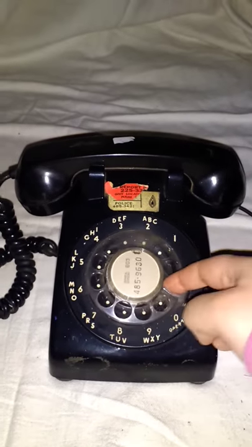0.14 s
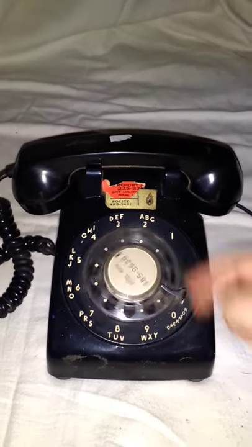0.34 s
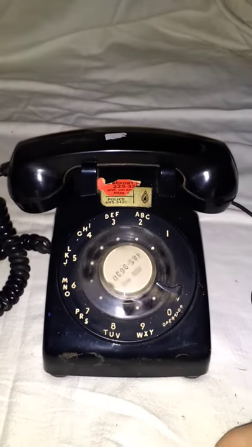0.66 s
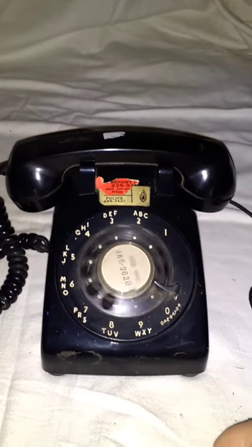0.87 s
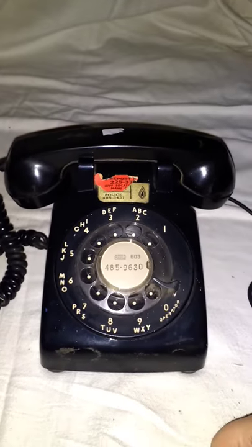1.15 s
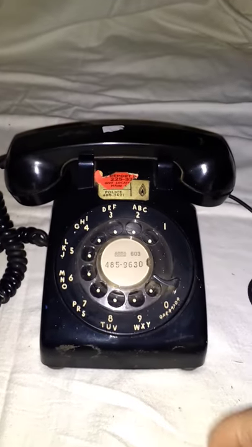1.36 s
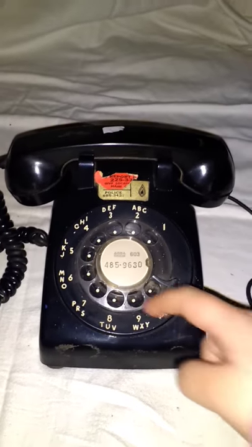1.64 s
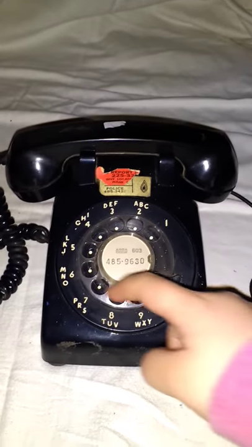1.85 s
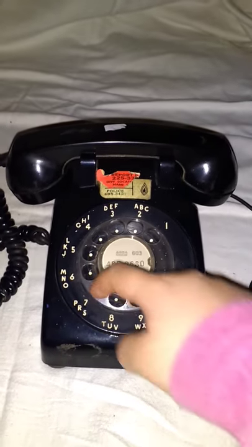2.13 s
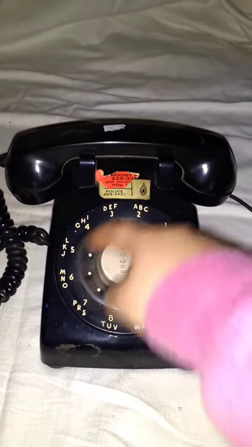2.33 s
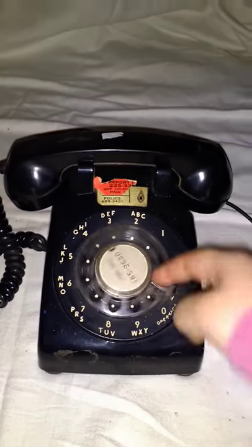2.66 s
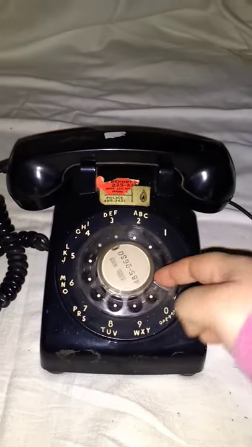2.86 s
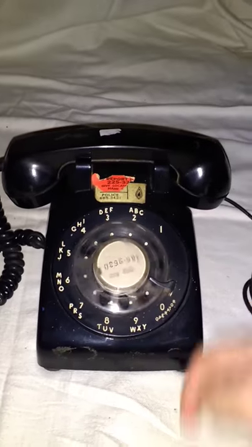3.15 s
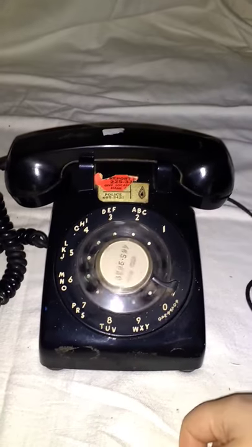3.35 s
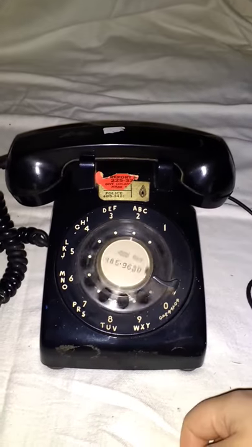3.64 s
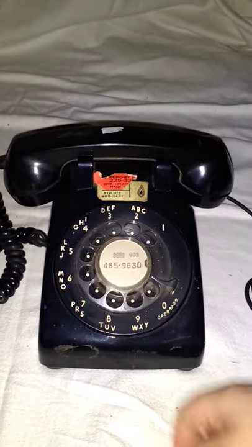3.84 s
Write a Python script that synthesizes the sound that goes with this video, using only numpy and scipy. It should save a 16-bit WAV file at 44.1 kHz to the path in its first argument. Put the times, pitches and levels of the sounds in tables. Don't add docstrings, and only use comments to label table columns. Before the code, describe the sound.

A rotary telephone dial, heard close in stereo in a quiet, soft bedroom, whirs home from 0.15 to 1.1 seconds, its buzzy chatter pulsing about twenty times a second, then clacks hard with a hollow boom. Faint ticks near 1.65. From 2.1 to 2.7 a finger winds it, with softer rasp, thin spring singing and clicks. It ratchets home from 2.85, clacking at 3.73. Low hum throughout.

```python
import sys
import numpy as np
from scipy import signal
from scipy.fft import rfft, irfft, next_fast_len
from scipy.io import wavfile
from scipy.ndimage import uniform_filter1d, map_coordinates

SR = 44100
rng = np.random.default_rng(int(sys.argv[2]) if len(sys.argv) > 2 else 0)


def int16_out(signal):
    q = np.round(np.clip(np.atleast_2d(signal).T, -1, 1) * 32767)
    wavfile.write(sys.argv[1], SR, q.astype(np.int16))


def voltage_ratio(level):
    return 10 ** (np.asarray(level, float) / 20)


N = 176400
T = np.arange(N) / SR

# f/Hz, width/Hz, level/dB
CASE = [(255, 58, -11), (324.3, 55, -3.5), (401.3, 85, -0.5), (480, 98.3, -2), (631, 182, -10.5),
        (1028, 77, -10.5), (1552, 59, -14)]


def unit(x):
    return x / np.sqrt(np.mean(x ** 2) + 1e-20)


def along(points, hz):
    f, v = np.transpose(points)
    return np.interp(np.log(hz + 1), np.log(f + 1), v)


def wobble(rate):
    knots = rng.standard_normal(int(N * rate / SR) + 4)
    return map_coordinates(knots, [T * rate])


def filtered(x, response):
    m = next_fast_len(N + SR // 2)
    return irfft(rfft(x, m) * response(np.fft.rfftfreq(m, 1 / SR)), m)[..., :N]


def body(modes):
    def response(f):
        total = 0
        for k, (center, width, db) in enumerate(modes):
            damping = 1j * f * width
            total = total + (-1) ** k * voltage_ratio(db) * damping / (center * center - f * f + damping)
        return total
    return response


def grit(spiky_db):
    size = np.minimum(rng.exponential(size=N), 3)
    return unit(rng.standard_normal(N) * voltage_ratio(spiky_db * size))


def gate(start, length, rise, t60):
    rising = np.clip((T - start) / max(rise, 1e-4), 0, 1)
    return rising * voltage_ratio(-60 * np.clip(T - start - length, 0, None) / t60)


def metal(x):
    # f/Hz, width/Hz, level/dB
    frame = [(2030, 230, -51), (2636, 62, 8.5), (4057, 79, -1), (4360, 53, -0.5), (4696, 40, -2.5),
             (5680, 700, -0.5), (7545, 740, -3), (9140, 344, -1), (10000, 270, -15), (11570, 250, -1),
             (12500, 550, -40), (15000, 1560, -2)]
    # f/Hz, level/dB
    frame_bed = [(900, -16), (1700, 5.5), (3000, -1.5), (10000, -15), (15500, -5)]
    return filtered(x, lambda f: body(frame)(f) + voltage_ratio(along(frame_bed, f)))


def governor():
    # t/s, chatter/dB, rasp/dB, hold/ms
    home_a = [(0.207, -30.5, -45, 18), (0.257, -26, -43, 15.5), (0.314, -26, -43.5, 8.1),
              (0.363, -27, -41.5, 15), (0.414, -24, -42, 13), (0.464, -26.5, -44, 23),
              (0.52, -24, -42.5, 15.7), (0.574, -25, -42.5, 12.6), (0.627, -24, -42.5, 11),
              (0.678, -24, -44, 15), (0.726, -27, -44.5, 26), (0.779, -26.5, -45.5, 14),
              (0.833, -25.5, -43, 16.5), (0.881, -26.5, -43, 28), (0.93, -27, -44.5, 35),
              (0.976, -23, -43, 27), (1.034, -24.5, -41.5, 17), (1.093, -23.5, -43.5, 14.6)]
    # t/s, chatter/dB, rasp/dB, hold/ms
    winding = [
        (2.219, -53, -52, 24.3),
        (2.261, -41, -51, 25),
        (2.298, -40, -47, 24.5),
        (2.332, -66, -46.5, 24),
        (2.39, -47, -45.5, 24.1),
        (2.446, -44, -44, 24),
        (2.49, -40, -44.5, 23.72),
        (2.542, -34, -44.5, 25),
        (2.59, -32, -45.5, 24.2),
        (2.647, -36, -43.5, 24.1),
    ]
    # t/s, chatter/dB, rasp/dB, hold/ms
    home_b = [(2.891, -34.5, -49, 27), (2.917, -30, -46.5, 11.4), (2.964, -29, -44.5, 18),
              (3.011, -29, -44.5, 25), (3.07, -24.5, -43, 12), (3.119, -23, -40, 16),
              (3.176, -24.5, -44.5, 16), (3.226, -25, -44, 16), (3.28, -23.5, -42.5, 11.3),
              (3.331, -25, -43, 13), (3.383, -24, -44, 14.6), (3.434, -25.5, -42, 21),
              (3.489, -25.5, -42.5, 18), (3.539, -27.5, -42.5, 23), (3.584, -25, -44.5, 25),
              (3.645, -25.5, -43, 15.5), (3.698, -28, -42.5, 16)]
    # f/Hz, level/dB
    slips = [(688, -6), (1410, -15.5), (2700, -23)]
    rubs = [*home_a, *winding, *home_b]
    lead_s, rise_s, rasp_rise_s = 0.0033, 0.0021, 0.005
    spread_hz, wander_hz = 30, 55

    pitch = np.interp(T, sorted(r[0] for r in rubs), rng.standard_normal(len(rubs)))
    buzz = 0
    for hz, db in slips:
        slip_hz = hz + spread_hz * pitch + wander_hz * wobble(250)
        phase = 2 * np.pi * np.cumsum(slip_hz) / SR
        buzz = buzz + voltage_ratio(db + 1.85 * wobble(160)) * np.sin(phase)

    chatter, rasp = np.zeros(N), np.zeros(N)
    for s, chatter_db, rasp_db, hold_ms in rubs:
        hold = hold_ms / 1000
        bite = voltage_ratio(-6.5) * gate(s - rise_s, rise_s, rise_s / 2, t60=0.038)
        chatter += voltage_ratio(chatter_db - 6) * (gate(s - lead_s, hold, rise_s, t60=0.023) + bite)
        drag = gate(s - rasp_rise_s / 2, hold, rasp_rise_s, t60=0.076)
        rasp += voltage_ratio(rasp_db + 0.18) * (drag + 0.3 * bite)

    knock = unit(filtered(grit(spiky_db=6), body(CASE)))
    scrape = voltage_ratio(0.52 * wobble(120)) * unit(metal(grit(spiky_db=4.0)))
    return chatter * (buzz + voltage_ratio(-9.5) * knock) + rasp * scrape


def gears():
    # start t/s, end t/s, rise/s, drone level/dB, hiss level/dB
    turns = [
        (0.136, 1.143, 0.044, -45.5, -54.5),
        (2.118, 2.675, 0.09, -43, -58.5),
        (2.836, 3.744, 0.048, -45.5, -55.5),
    ]
    drone = unit(filtered(grit(spiky_db=3.5) * voltage_ratio(2.5 * wobble(60)), body(CASE)))
    hiss = filtered(metal(grit(spiky_db=-0.5)), lambda f: 1 / (1 + (f / 7860) ** 6))
    hiss = unit(hiss) * voltage_ratio(2.2 * wobble(40))
    out = np.zeros(N)
    for start, end, rise, drone_db, hiss_db in turns:
        turning = gate(start, end - start, rise, t60=0.28) ** 2
        out += turning * (voltage_ratio(drone_db) * drone + voltage_ratio(hiss_db) * hiss)
    return out


def contacts():
    # t/s, crack/dB, thud/dB, snap/dB
    stops = [(1.1387, -32.5, -25.5, -32), (1.1429, -32.5, -16, -55), (1.146, -35.5, -31, -53),
             (1.152, -38, -26, -55), (1.156, -45, -24.5, -60), (1.177, -66, -26, -60),
             (3.7282, -34.5, -25, -39), (3.7301, -31.5, -16, -43), (3.734, -38.5, -19.5, -44),
             (3.738, -42, -18, -50), (3.743, -36.5, -31, -42), (3.756, -46, -33, -60),
             (2.6421, -50, -33, -47), (2.6737, -39, -24, -39), (2.68, -39.5, -26, -41),
             (2.687, -44, -39, -62)]
    # t/s, crack/dB, thud/dB
    ticks = [(.008, -53.5, -36.5), (0.085, -53, -54), (0.141, -55, -42), (0.183, -53, -22.5),
             (0.341, -71, -44), (1.61, -60, -65), (1.632, -57, -65), (1.665, -61.5, -68), (1.731, -62, -65),
             (2.165, -71, -41), (2.225, -52, -31), (2.821, -64, -37), (2.875, -57, -28.5),
             (3.518, -53, -53)]
    # f/Hz, level/dB, t60/s
    steel = [(1004, 4, .07), (2000, -8, 0.026), (2750, -12, .05), (4105, 1.5, 0.048), (4330, 5, 0.028),
             (5750, 6, 0.025), (6300, 1.5, 0.022), (6820, -2.5, 0.021), (6900, 4, .025)]
    hard_db, ring_grows = -35, 1.7
    push_s = 0.0004

    out, push, t = np.zeros(N + SR), np.zeros(N), T[:SR // 4]
    crack = filtered(metal(grit(spiky_db=2.5)), lambda f: 1 / (1 + (f / 8500) ** 4))
    crack = unit(crack)
    snap_band = lambda f: 1 / (1 + (3500 / (f + 1)) ** 2) / (1 + (f / 11000) ** 2)
    snap = unit(filtered(grit(spiky_db=-1.5), snap_band))
    for s, crack_db, thud_db, *snap_db in [*stops, *ticks]:
        ring = np.zeros(len(t))
        for hz, db, t60 in steel:
            decay = voltage_ratio(db + rng.normal(0, 3.3) - 60 * t / t60)
            ring += decay * np.sin(2 * np.pi * hz * rng.normal(1, 0.012) * t)
        ring_db = hard_db + ring_grows * (crack_db - hard_db) - 7.5
        out[round(s * SR):][:len(t)] += voltage_ratio(ring_db) * ring
        crack_shape = gate(s, 0.00021, 0, t60=0.012) + voltage_ratio(-21) * gate(s, 0, 0, t60=0.19)
        out[:N] += voltage_ratio(crack_db) * crack * crack_shape
        out[:N] += voltage_ratio(max(snap_db, default=crack_db)) * snap * gate(s, 0.0012, 0, t60=0.0081)
        push += voltage_ratio(thud_db + 16.5) * gate(s, 0, push_s / 5, push_s * 7)
    return out[:N] + filtered(push, body(CASE))


def spring():
    # f/Hz, width/Hz, level/dB
    coils = [(2700, 550, 0), (4190, 150, 3.5), (4750, 80, 0)]
    start, end = 2.19, 2.56
    song = unit(filtered(grit(spiky_db=5.0), body(coils)))
    return voltage_ratio(-52.5 + 3.7 * wobble(40)) * gate(start, end - start, 0.095, t60=0.24) * song


def booms():
    # t/s, hold/s, level/dB, f/Hz
    shoves = [(.002, 0.043, -49.5, 480), (0.155, 0.058, -44, 253.5), (1.141, 0.025, -36.5, 470.4),
              (1.182, 0.035, -39, 345), (1.217, 0.037, -43, 350), (1.95, 0.033, -55.5, 370),
              (2.198, 0.064, -40, 255), (3.726, 0.011, -31, 468.4), (3.761, 0.029, -35.5, 292),
              (3.793, 0.021, -42.5, 332), (3.813, 0.023, -41.5, 401)]
    wander = np.cumsum(0.0689 * wobble(60)) / SR
    out = np.zeros(N)
    for s, hold, db, hz in shoves:
        sag_db = 37 * np.clip(T - s, 0, 1)
        tone = np.sin(2 * np.pi * hz * (T + wander))
        out += voltage_ratio(db - sag_db) * gate(s, hold, 0.0032, t60=0.023) * tone
    return voltage_ratio(1.7 * wobble(90)) * out


def ports(x, lead, high_hz):
    early_s, late_s = 558.7e-6, 369e-6

    def both(f):
        low = 1 / (1 + (f / 1700) ** 30)
        high = 1 / (1 + (high_hz / (f + 1)) ** 30)
        z = low * np.exp(1j * along(lead, f))
        z = z - (1 - low - high) * np.exp(2j * np.pi * f * early_s)
        z = z - high * np.exp(-2j * np.pi * f * late_s)
        return np.array([np.ones_like(z), z / (abs(z) + 1e-9)])
    return filtered(x, both)


def scattered(x):
    # f/Hz, level/dB
    scatter = [(2000, -26), (3600, -6), (5400, -8), (7200, -3), (9000, -2), (10800, -14), (14000, -6)]
    hz, _, z = signal.stft(x, SR, nperseg=256)
    patch = uniform_filter1d(rng.standard_normal(z.shape), size=5, axis=0)
    patch = uniform_filter1d(patch, size=16, axis=1)
    spin = np.exp(2j * np.pi * rng.random((2,) + z.shape))
    level = voltage_ratio(along(scatter, hz)[:, None] + 5 * unit(patch))
    return signal.istft(z * spin * level, SR, nperseg=256)[1][:, :N]


def room(x):
    # f/Hz, t60/s
    decay = [(400, 0.26), (10000, 0.23)]
    hz, t, z = signal.stft(rng.standard_normal((2, SR // 3)), SR, nperseg=256)
    fade = voltage_ratio(-60 * t / along(decay, hz)[:, None])
    tail = signal.istft(z * fade, SR, nperseg=256)[1]
    tail = tail / np.linalg.norm(tail[0])
    return signal.fftconvolve(np.pad(x, (256, 0))[None], tail, axes=1)[:, :N]


def air():
    # f/Hz, level/dB per Hz
    spectrum = [(25, -38), (105, 3.5), (200, -3), (450, -11), (1200, -19), (5000, -24.5), (10000, -30.5),
                (15600, -33.5)]
    # f/Hz, lead/rad
    air_lead = [(900, 0.2), (1300, 0.84), (1700, 2.2)]
    color = lambda f: voltage_ratio(along(spectrum, f))
    apart = lambda f: 0.44 + (1 - 0.44) / (1 + (f / 740) ** 8)
    shared = ports(rng.standard_normal(N), air_lead, high_hz=SR)
    tone = filtered(shared, lambda f: color(f) * np.sqrt(abs(1 - apart(f) ** 2)))
    tone = tone + filtered(rng.standard_normal((2, N)), lambda f: color(f) * apart(f))
    return voltage_ratio(-54.5 + 0.97 * wobble(6.02)) * unit(tone)


def scene():
    # f/Hz, lead/rad
    lead = [(400, -0.98), (620, -1.4), (700, 0.95), (1100, -0.13), (1300, -2), (1650, 4.5)]
    # f/Hz, left over right/dB
    lean = [(520, 0), (680, 11), (900, 2), (1450, -8), (1900, 0), (2750, -8), (3200, 0)]
    room_db = -11
    dial = governor() + gears() + contacts() + spring() + booms()
    dial = filtered(dial, lambda f: (1j * f / (55 + 1j * f)) ** 2)
    answer = room(dial)
    heard = ports(dial + voltage_ratio(room_db) * answer[0], lead, high_hz=9700)
    heard = heard + voltage_ratio(room_db - 7) * answer + scattered(dial)
    return filtered(heard, lambda f: voltage_ratio(np.outer([.5, -.5], along(lean, f)))) + air()


def joint(x):
    z = signal.stft(np.array([x[0] + x[1], x[0] - x[1]]) / 2, nperseg=2048)[2]
    power = uniform_filter1d(abs(z) ** 2, size=12, axis=1)
    power = uniform_filter1d(power, size=2, axis=2)
    bass = (np.fft.rfftfreq(2048, 1 / SR) < 2500)[:, None]
    keep = (power > voltage_ratio(2 * -7) * power[::-1]) | bass
    mid, side = signal.istft(z * keep, nperseg=2048)[1][:, :N]
    return np.array([mid + side, mid - side])


def roll_off(x):
    return signal.sosfilt(signal.butter(12, 16640, fs=SR, output="sos"), x)


def record(dry):
    top_hz = 15650
    band = lambda f: np.where(f < top_hz - 100, 1, voltage_ratio(-22) * (f < top_hz + 180))
    mix = joint(filtered(dry, band))
    return roll_off(mix)


dry = scene()
out = record(dry)
int16_out(out)
```